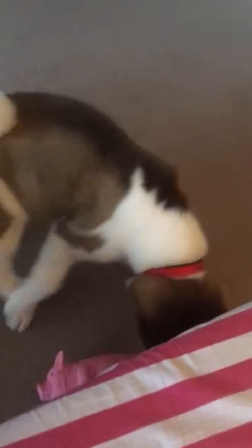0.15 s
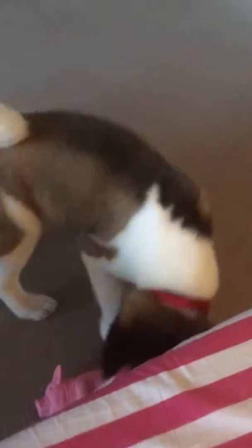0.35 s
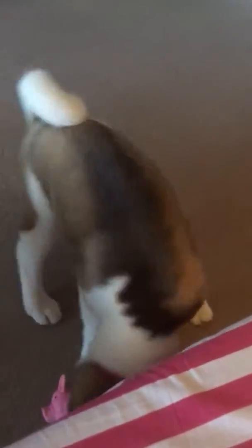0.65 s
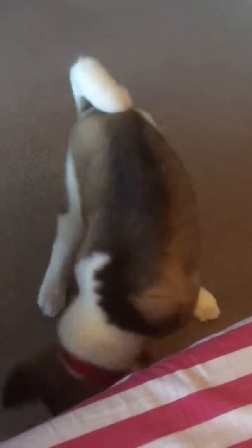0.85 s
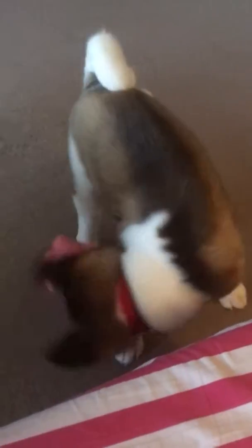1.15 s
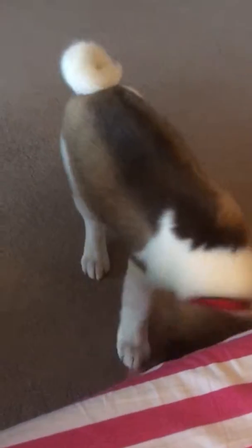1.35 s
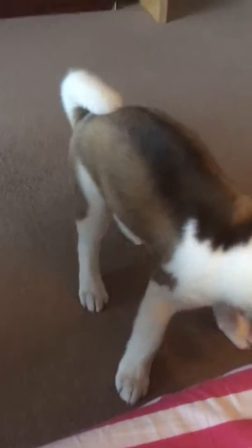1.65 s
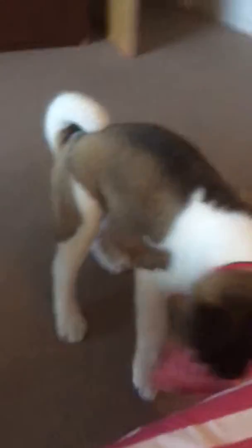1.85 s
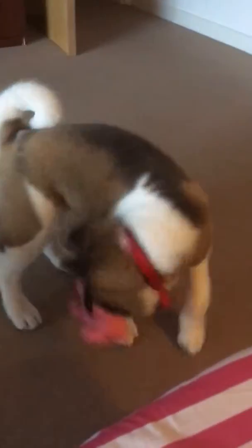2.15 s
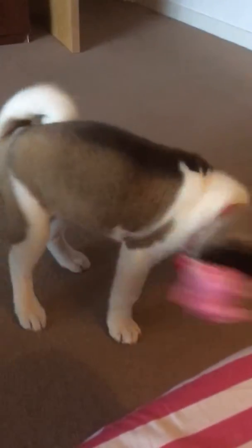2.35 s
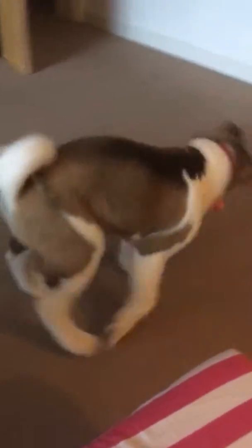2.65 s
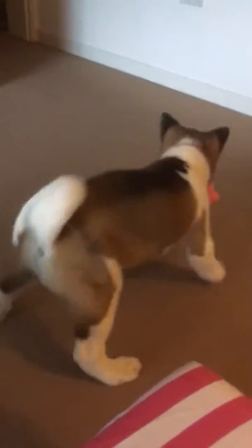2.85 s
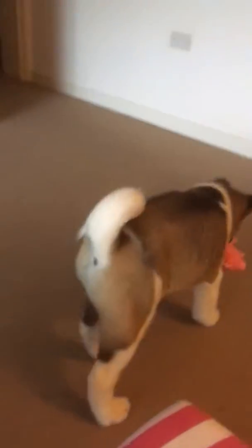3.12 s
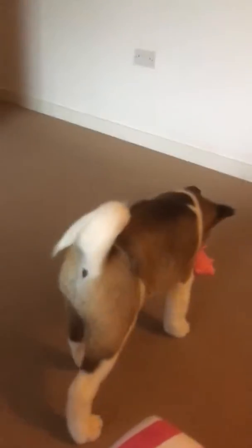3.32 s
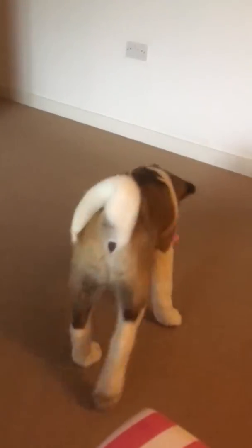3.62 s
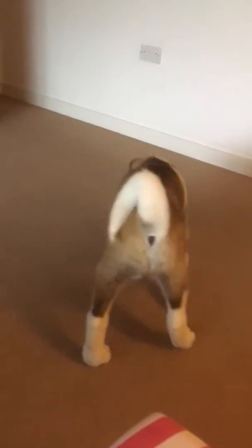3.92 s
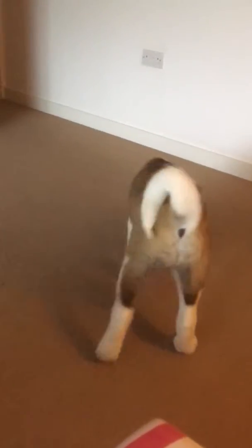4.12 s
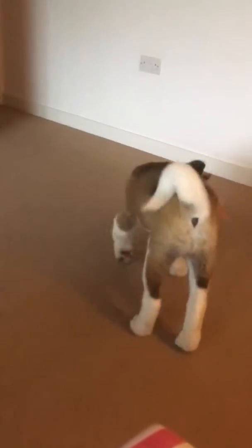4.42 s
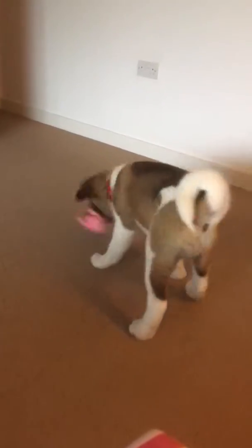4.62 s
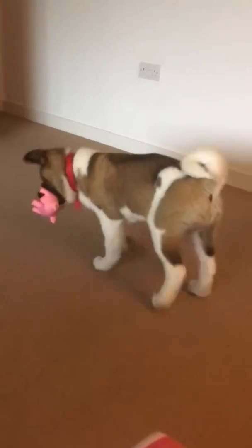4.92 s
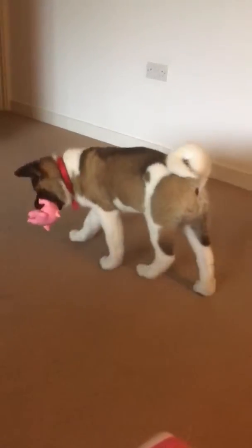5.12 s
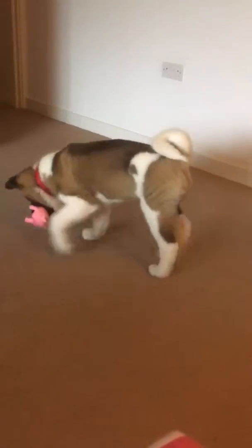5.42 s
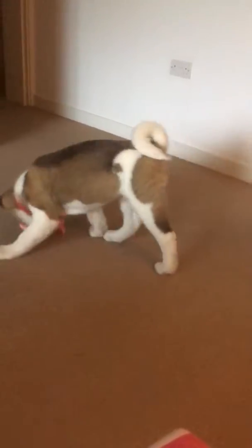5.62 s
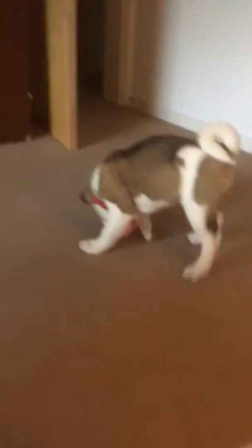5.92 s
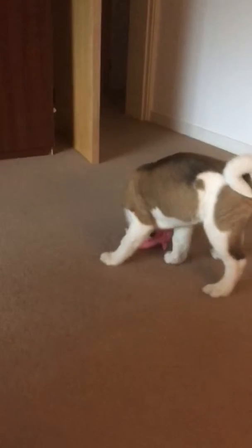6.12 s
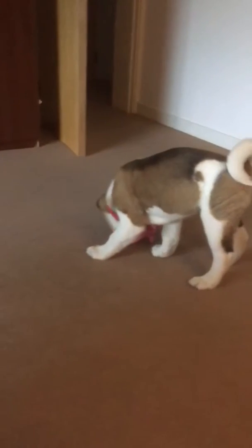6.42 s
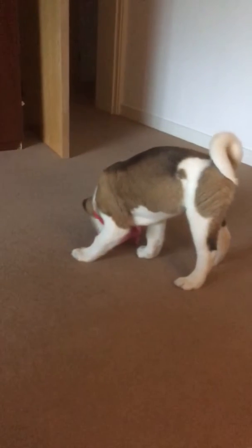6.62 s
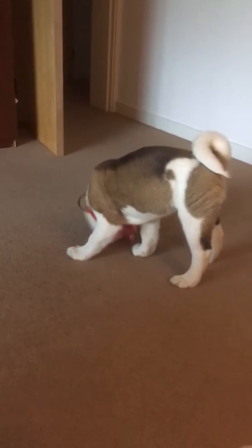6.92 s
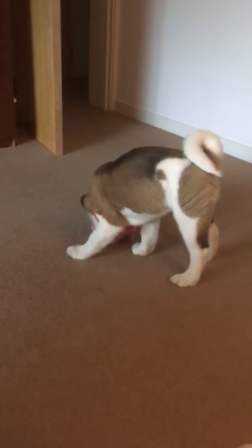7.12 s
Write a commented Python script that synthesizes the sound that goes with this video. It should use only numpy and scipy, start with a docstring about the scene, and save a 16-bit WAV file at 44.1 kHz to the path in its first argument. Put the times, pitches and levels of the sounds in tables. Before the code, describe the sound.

A puppy chews a rubber pig toy, making short, rattling grunts, with paws thudding and scuffing softly on carpet.

```python
"""A puppy carries and chews a rubber pig toy in a carpeted room with bare walls and a faint hum.
First its fur rustles, and paws and toy thud and scuff on the carpet. At 0.7 s the grunts begin:
each bite drives air past a reed (a small flap in a short tube), which slaps slowly enough to rattle.
The loudest thud lands at 1.5 s. Scattered grunts and clicks of teeth on rubber follow,
and from about 5 s to the end the grunts come closer together and are mostly raspier."""
import sys
import numpy as np
from scipy import signal
from scipy.fft import rfft, irfft, next_fast_len
from scipy.io import wavfile
from scipy.ndimage import uniform_filter1d, map_coordinates

SR = 44100
rng = np.random.default_rng(int(sys.argv[2]) if len(sys.argv) > 2 else 0)


def wav_record(signal):
    """Record a signal, one row per channel, as 16-bit PCM in the file named by sys.argv[1]."""
    frames = np.transpose(np.atleast_2d(signal))
    bounded = np.clip(frames, -1, 1)
    # unit amplitude maps onto the largest positive 16-bit level
    quanta = np.round(bounded * 32767).astype(np.int16)
    wavfile.write(sys.argv[1], SR, quanta)


N = 320607

# The tone of rubbing, for both carpet and fur: (frequency [Hz], level [dB])
RUBBING_TONE = [(150, 3.5), (500, 7), (1500, -2.5), (3500, -5), (6000, -7.5), (10000, -8.5), (16000, -4)]


def amp(db):
    """Turn decibels into a number to multiply by."""
    return 10 ** (np.asarray(db) / 20)


def unit(x):
    """Scale a signal so its average power is 1."""
    return x / np.sqrt(np.mean(x ** 2) + 1e-20)


def unit_energy(x):
    """Scale a signal so its total energy is 1."""
    return x / (np.linalg.norm(x) + 1e-20)


def at(curve, s):
    """Read a (time, value) table at time s."""
    return np.interp(s, *np.transpose(curve))


def along(points, hz):
    """Read a (frequency, value) table at hz, with octaves evenly spaced."""
    frequencies, values = np.transpose(points)
    return np.interp(np.log(hz + 1), np.log(frequencies + 1), values)


def bump(hz, centre_hz, width):
    """A smooth hill of height 1 around one frequency."""
    return np.exp(-(np.log((hz + 1) / centre_hz) / width) ** 2)


def add(track, s, x):
    """Mix x into the track from time s on."""
    i = max(round(s * SR), 0)
    track[i:i + len(x)] += x[:max(len(track) - i, 0)]


def filtered(x, response):
    """Multiply each frequency in x by response(hz)."""
    size = next_fast_len(N + SR // 2)
    return irfft(rfft(x, size) * response(np.fft.rfftfreq(size, 1 / SR)), size)[:N]


def noise(tone):
    """Noise of power 1, shaped by a (frequency, level) table."""
    return unit(filtered(rng.standard_normal(N), lambda hz: amp(along(tone, hz))))


def impulse(tone_db, size=2048):
    """How an object with the tone tone_db(hz) rings after one sharp tap."""
    cepstrum = irfft(np.log(amp(tone_db(np.fft.rfftfreq(size, 1 / SR)))))
    # Folding the second half onto the first puts all the ringing after the tap.
    cepstrum[1:size // 2] *= 2
    cepstrum[size // 2 + 1:] = 0
    return unit_energy(irfft(np.exp(rfft(cepstrum))))


def room_hum():
    """The room hums steadily over the low rumble of the building."""
    # The tone of each: (frequency [Hz], level [dB])
    hum = [(59, -39), (100, -1), (170, -9.5), (206, -10.5), (260, -21), (415, -21.5), (481, -31),
           (836, -21.5), (1250, -26), (3190, -29), (4380, -37), (13200, -36.5), (16000, -37.5)]
    rumble = [(20, -39), (35, -25), (50, 7.5), (62, 5.5), (80, -5.5), (110, -15.5), (200, -41.5)]
    return amp(-65.5) * noise(hum) + amp(-60.5) * noise(rumble)


def wall_echoes(x, early_db=7, early_fade_s=0.3, gap_s=.004):
    """Near walls answer strongly, then a wash of echoes fades; the pattern shifts as the puppy moves."""
    # How long the room rings: (frequency [Hz], time to fade by 60 dB [s])
    fade_times = [(150, 0.52), (500, 0.21), (1000, 0.61), (2500, 0.44), (6000, 0.41), (14000, 0.19)]
    out, hop = np.zeros(N), SR // 4
    for i in range(0, N, hop):  # each overlapping piece gets its own random echoes
        hz, t, bands = signal.stft(rng.standard_normal(SR), SR, nperseg=256)
        decay = amp(-60 * t / along(fade_times, hz)[:, None]) + amp(early_db - 60 * t / early_fade_s)
        tail = signal.istft(bands * decay, SR, nperseg=256)[1]
        start = max(i - hop, 0)
        piece = x[start:i + hop]
        blend = np.cos(np.pi / 2 * (start + np.arange(len(piece)) - i) / hop)
        add(out, start / SR + gap_s, signal.fftconvolve(piece * blend, unit_energy(tail)))
    return out


def fur(flicker_db=3, flickers_per_s=9):
    """The coat rustles faintly and unevenly as the puppy moves."""
    # The rustle of moving about: (time [s], level [dB])
    motion = [(0, -58), (.35, -72), (.5, -67.5), (1.0, -58.5), (1.4, -72.5), (1.8, -65), (2.5, -67.5),
              (3.1, -65.5), (3.35, -68.5), (4.05, -72), (4.75, -68.5), (5.0, -70), (5.4, -72), (7.2, -74)]
    random_points = rng.standard_normal(int(N * flickers_per_s / SR) + 4)
    flicker = map_coordinates(random_points, [np.arange(N) * flickers_per_s / SR])
    return amp(at(motion, np.arange(N) / SR)) * unit(amp(flicker_db * flicker) * noise(RUBBING_TONE))


def scuffs(grain_db=1.0):
    """Paws and toy brush the carpet, sounding grainy as the fibres catch."""
    # One stroke a row: (time [s], length [s], level [dB], centre frequency [Hz])
    strokes = [(0.065, 0.064, -59.5, 2980), (0.22, 0.092, -56, 3800), (0.349, 0.046, -59.5, 1460),
               (1.046, 0.042, -56, 2500), (1.498, 0.069, -55, 4830), (2.439, 0.042, -56.5, 4170),
               (2.619, 0.12, -61.5, 1800), (2.813, 0.053, -57, 8000), (2.958, 0.15, -60.5, 2800),
               (3.894, 0.064, -55.5, 3670), (4.638, 0.047, -58, 2200), (4.698, 0.052, -54, 5500),
               (5.092, 0.11, -54.5, 1200), (5.643, 0.059, -56, 4940)]
    out = np.zeros(N)
    for s, length, db, centre_hz in strokes:
        ring = impulse(lambda hz: along(RUBBING_TONE, hz) + 9 * bump(hz, centre_hz, width=1.0))
        swell = np.sqrt(np.abs(np.hanning(round(length * SR))))
        add(out, s, amp(db) * signal.fftconvolve(swell * rng.standard_normal(len(swell)), ring))
    grain = unit(uniform_filter1d(rng.standard_normal(N), size=120))
    return out * unit(amp(grain_db * grain))


def mouth_clicks(fade_s=0.021):
    """Teeth and tongue click on the toy, and the rubber quickly deadens the sound."""
    # One click a row: (time [s], peak level [dB], centre frequency [Hz])
    clicks = [(1.524, -39, 1470), (2.43, -42, 1780), (2.466, -52, 880), (4.54, -51, 780),
              (4.58, -49.5, 520), (5.105, -47.5, 440), (5.14, -48.5, 470), (6.536, -44, 794)]
    out, t = np.zeros(N), np.arange(SR // 10) / SR
    for s, db, centre_hz in clicks:
        ring = impulse(lambda hz: 36 * bump(hz, centre_hz, width=0.97))
        click = signal.fftconvolve(rng.standard_normal(len(t)) * amp(-60 * t / fade_s), ring)
        add(out, s, amp(db) * click / np.abs(click).max())
    return out


def thuds(attack_s=0.0017, fade_cycles=14, soft_thump_hz=102.6):
    """Paws and toy hit the floor: soft blows thump low, harder ones thump higher and knock more."""
    # One blow a row: (time [s], peak level [dB], thump pitch [Hz])
    blows = [(0.016, -38.5, 129), (0.071, -40.5, 108), (1.061, -44.5, 217), (1.1, -36, 174),
             (1.495, -33, 428), (1.507, -20, 183), (1.52, -31, 121), (2.514, -39, 94), (2.685, -51.5, 200),
             (2.87, -49, 81), (2.971, -36, 117), (3.068, -47.5, 72.4), (4.243, -45.5, 113),
             (4.37, -41.5, 87.3), (4.649, -41.5, 108.5), (4.741, -45.5, 89), (5.656, -40.5, 112),
             (5.69, -43, 76), (6.033, -37.5, 92), (6.533, -42.5, 189)]
    # The notes in the floor's knock: (frequency [Hz], level [dB], time to fade by 60 dB [s])
    floor_notes = [(279.3, -2.5, 0.15), (360, -0.5, 0.056), (488, 2, 0.027), (633, 0.5, 0.025),
                   (762, -14.5, 0.084), (885, -17, 0.044)]
    out, t = np.zeros(N), np.arange(SR // 3) / SR
    for s, db, thump_hz in blows:
        thump = amp(-60 * t * thump_hz / fade_cycles) * np.sin(2 * np.pi * thump_hz * t)
        knock = np.zeros(len(t))
        for hz, note_db, fade_s in floor_notes:
            decay = amp(note_db + rng.normal(0, 2.8) - 60 * t / fade_s)
            note_hz = hz * rng.normal(1, 0.023)
            knock += decay * np.sin(2 * np.pi * note_hz * t + rng.uniform(0, 2 * np.pi))
        knock_db = -17.5 + 9 * np.log2(thump_hz / soft_thump_hz)
        blow = (thump + amp(knock_db) * knock) * (1 - np.exp(-t / attack_s))
        add(out, s, amp(db) * blow / np.abs(blow).max())
    return out


def bite_pressure_db(progress, crest, rise_db=18, fall_db=9, roundness=1.54):
    """As a bite goes from 0 to 1, its pressure swells to 0 dB at the crest and then eases off."""
    before = np.maximum(crest - progress, 0) / (crest + 1e-9)
    after = np.maximum(progress - crest, 0) / (1 - crest + 1e-9)
    return -rise_db * before ** roundness - fall_db * after ** roundness


def reed_slaps(length, cycles, slowing, crest, back_db, hurry=.14, jitter_s=.00012, scatter_db=1.08):
    """Times and levels of the reed's slaps: each cycle swings out, then back, usually more softly."""
    progress = np.linspace(0, 1, 2 * round(cycles) + 1)
    # Hurry packs the slaps together mid-bite; slowing spreads them out towards the end.
    shift = progress * (1 - progress) * (hurry * (1 - 2 * progress) - slowing)
    times = length * (progress + shift) + jitter_s * rng.standard_normal(len(progress))
    db = bite_pressure_db(progress, crest) + scatter_db * rng.standard_normal(len(progress))
    db[1::2] += min(back_db, 0)
    return np.maximum(times, 0), db


def air_pulses(times, db, hiss_share, puff_s):
    """Each slap makes a sharp pulse of pressure and a short, hissing puff of air."""
    slaps = np.bincount(np.round(times * SR).astype(int), amp(db), round(times.max() * SR) + SR // 20)
    age = np.arange(SR // 50) / SR / puff_s
    puffs = signal.fftconvolve(slaps, unit_energy(age * np.exp(-age)))[:len(slaps)]
    hiss = puffs * rng.standard_normal(len(slaps))
    return np.sqrt(1 - hiss_share) * slaps + np.sqrt(hiss_share) * hiss


def belly_ring(mouth_hz, mouth_db):
    """The toy's hollow rubber belly rings low, and the mouth boosts one band of it."""
    # The belly's tone: (frequency [Hz], level [dB])
    tone = [(50, -9.5), (110, -3.5), (185, 5), (270, -1.5), (400, -7), (580, 0.5), (800, -2), (950, 1.5),
            (1100, -5), (1350, -7), (1650, -10.5), (2000, -5), (3000, -30.5), (6000, -70.5)]
    return impulse(lambda hz: along(tone, hz) + mouth_db * bump(hz, mouth_hz, width=.17))


def tube_ring(pitch_hz=2431, scatter=0.0093):
    """The short tube rings at two close notes, which each grip shifts a little."""
    # The notes, wider ones fading sooner: (multiple of the tube's pitch, width [Hz], level [dB])
    notes = [(.97, 228, 14.5), (1.04, 285, 6.5)]
    t = np.arange(SR // 30) / SR
    tube_hz = pitch_hz * (1 + scatter * rng.standard_normal())
    ring = np.zeros(len(t))
    for k, (ratio, width_hz, db) in enumerate(notes):
        decay = amp(db) * np.exp(-np.pi * width_hz * t)
        ring += (-1) ** k * decay * np.sin(2 * np.pi * tube_hz * ratio * t)
    return unit_energy(ring)


def rasp_ring(s, reed_hz, ring_db=4, ripple_db=2.15, ripple_hz=330):
    """The slapping reed rasps; each new grip of the jaws puts fresh ripples in its tone."""
    # The tone of a slap: (frequency [Hz], level [dB])
    tone = [(800, -8), (1800, -5), (3000, -19.5), (3600, -6), (4200, -6), (4900, -2.5), (6100, 1.5),
            (7000, -8.5), (8000, -4.5), (9400, -6.5), (10300, -15), (11300, -7.5), (12600, -7.5),
            (14000, -17), (16000, -11.5)]
    # The highest treble as the toy is turned about: (time [s], boost [dB])
    treble = [(.7, 1), (1.25, -3), (1.949, -3), (4.4, -2.5), (5.2, -4), (5.5, 2), (5.75, 3), (6.8, 7.5),
              (7.25, 4)]

    def tone_db(hz):
        treble_db = along([(5500, 0), (9500, at(treble, s))], hz)
        grip_db = ripple_db * map_coordinates(rng.standard_normal(100), [hz / ripple_hz], mode="nearest")
        return along(tone, hz) + ring_db * bump(hz, reed_hz, width=0.17) + treble_db + grip_db
    return impulse(tone_db)


def toy_grunts(usual_flap_hz=87.9, usual_bite_db=-29.5, reed_hz_per_db=97, snap=0.22):
    """Bites push air past the reed. Returns the direct sound and the sound sent to the walls."""
    # One bite a row: (start [s], end [s], reed cycles, slowing [0-1], level [dB],
    # place of the crest [0-1], rasp level [dB], mouth resonance [Hz])
    bites = [(0.66, 0.7495, 8, 0, -21, 0.3, 2.5, 685), (0.769, 0.852, 6, 0.01, -32, 0, -6, 660),
             (0.868, 0.937, 5, 0.15, -30.5, 0.26, -7, 710), (1.071, 1.102, 2, 0, -38, 0.5, -3.5, 550),
             (1.202, 1.344, 9, 0, -31.5, 0.96, -3.5, 696), (1.914, 1.976, 6, 0.37, -24.5, 0.65, -1, 780),
             (2.072, 2.136, 5, 0.38, -29.5, 0.35, -2, 790), (2.33, 2.388, 4, 0.24, -39, 0.84, 1, 520),
             (3.41, 3.468, 4, 0.19, -32.5, 0.36, -4, 550), (3.668, 3.758, 7, 0.22, -31, 0.49, -5.5, 575),
             (4.087, 4.154, 6, 0.24, -31.5, 0.4, -2.5, 670), (4.359, 4.415, 4, 0.28, -35, 0.38, 0.5, 784),
             (5.173, 5.245, 7, 0.11, -29, 0.37, 0, 1140), (5.48, 5.549, 7, 0.15, -30, .58, -1.5, 600),
             (5.72, 5.774, 5, 0.13, -22, 0.57, 2.5, 664), (5.985, 6.057, 8, 0.29, -31, 0.82, 2.5, 850),
             (6.276, 6.369, 10, 0.24, -30.5, 0.69, 2, 835), (6.382, 6.466, 5, 0.1, -40.5, 0, 18, 870),
             (6.717, 6.845, 13, 0.15, -29, 0.47, 6, 815), (6.861, 6.955, 6, 0.03, -34, 0.93, 5.5, 970),
             (7.216, 7.265, 4, 0.03, -35.5, 0.91, -0.5, 770)]
    # How freely the toy lies: (time [s], looseness [0 clamped in the jaws, 1 loose on the floor])
    looseness = [(.7, 0.92), (.85, 0.49), (1.08, 0.54), (1.3, 0.076), (2.1, .05), (3.7, 0.18), (4.4, 0.42),
                 (5.2, 0.038), (5.75, 0.61), (6.02, 0.75), (6.8, 1), (7.25, 0.79)]
    # The more the puppy hides the toy, the more comes by the walls: (time [s], room over direct [dB])
    shade = [(.7, -3), (1.07, -3), (1.3, -4.5), (2.35, -8), (3.702, 4.5), (4.1, 1.5), (5.2, -4), (5.5, 1),
             (5.998, 0), (6.85, -0.5), (7.25, 9.5)]
    direct, to_walls = np.zeros(N), np.zeros(N)
    for s, end_s, cycles, slowing, level_db, crest, rasp_db, mouth_hz in bites:
        length, middle_s = end_s - s, (s + end_s) / 2
        loose, room_db = at(looseness, middle_s), at(shade, middle_s)
        # The reed's speed (in doublings of the usual rate) and the toy's looseness set the tone.
        speed = np.log2(round(cycles) / length / usual_flap_hz)
        back_db = -16 + 33 * speed + 11.5 * loose
        belly_db = 11.5 + 4 * speed + 11.5 * loose
        tube_db = 16 - 0.8 * loose
        # A harder bite tightens the reed, so it rings higher.
        reed_hz = 5510 + 1100 * speed + reed_hz_per_db * (level_db - usual_bite_db)
        belly = belly_ring(mouth_hz, mouth_db=0.5 + 6.5 * speed + 6 * loose)
        tube = tube_ring()
        times, db = reed_slaps(length, cycles, slowing, crest, back_db)
        db += level_db - 20 * np.log10(np.hypot(1, amp(rasp_db)))  # tube and rasp share the level
        bright_db = snap * (db - db.max())  # harder slaps sound brighter
        bright_db[1::2] -= 2.5  # the back swing closes more softly and rasps less
        rasp = rasp_ring(middle_s, reed_hz)
        belly_air = air_pulses(times, db, hiss_share=0.18, puff_s=0.0016)
        tube_air = air_pulses(times, db, hiss_share=0.51, puff_s=0.00074)
        rasp_air = air_pulses(times, db + bright_db, hiss_share=0.87, puff_s=0.00084)
        parts = [(belly, belly_air, belly_db, room_db),
                 (tube, tube_air, tube_db, room_db),
                 (rasp, rasp_air, 17.5 + rasp_db, room_db - 0.5)]  # beamed, so less reaches the walls
        for ring, air, gain_db, walls_db in parts:
            sound = amp(gain_db) * signal.fftconvolve(air, ring)
            add(direct, s, sound * amp(-walls_db / 2))
            add(to_walls, s, sound * amp(walls_db / 2))
    return direct, to_walls


def scene():
    """Mix the toy, the puppy's movements, their echoes and the hum into one channel."""
    grunts, grunts_to_walls = toy_grunts()
    movements = thuds() + mouth_clicks() + scuffs() + fur()
    echoes = wall_echoes(amp(1.0) * grunts_to_walls + amp(-4.5) * movements)
    return (grunts + movements + echoes + room_hum())[None]


def record(dry, top_hz=16000):
    """Cut away the very highest treble."""
    return np.array([filtered(channel, lambda hz: hz < top_hz) for channel in dry])


dry = scene()
out = record(dry)
wav_record(out)
```